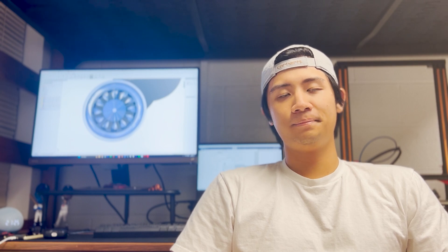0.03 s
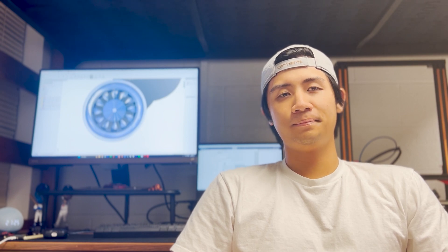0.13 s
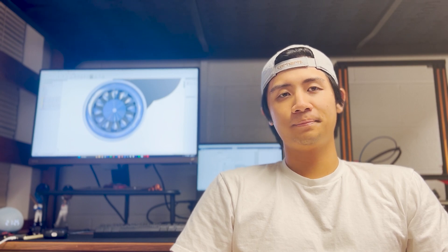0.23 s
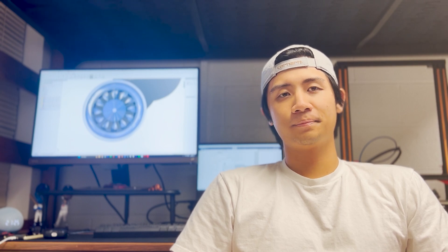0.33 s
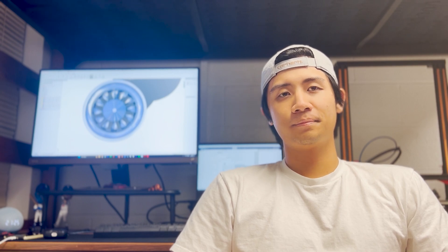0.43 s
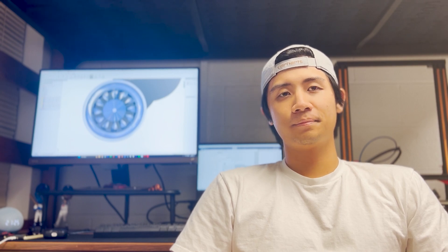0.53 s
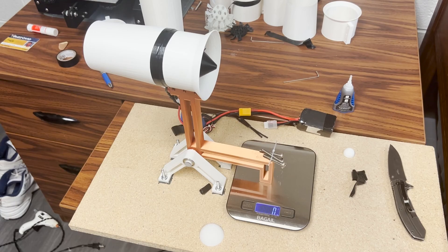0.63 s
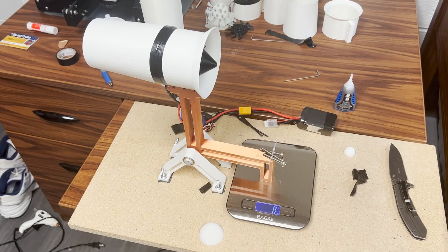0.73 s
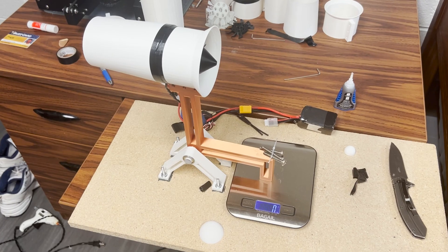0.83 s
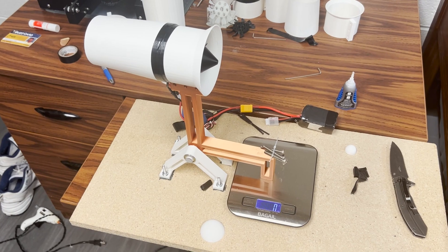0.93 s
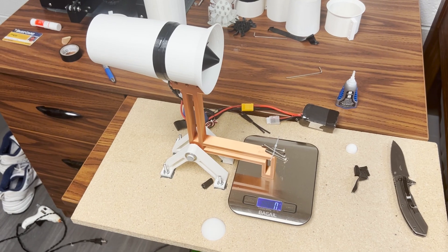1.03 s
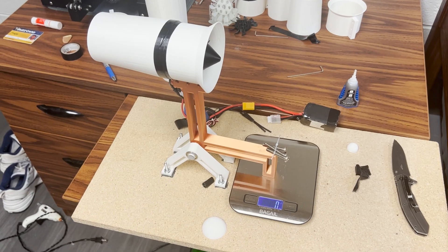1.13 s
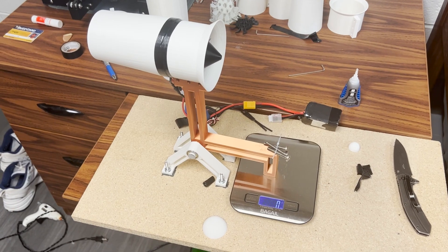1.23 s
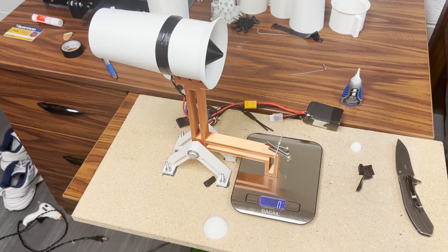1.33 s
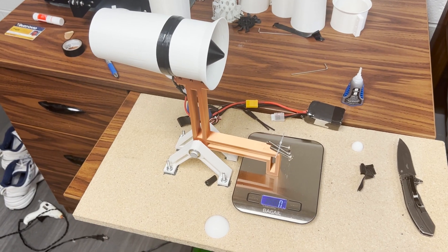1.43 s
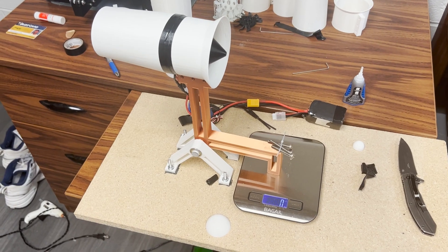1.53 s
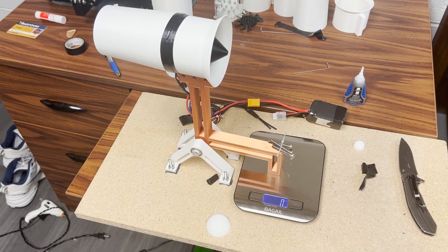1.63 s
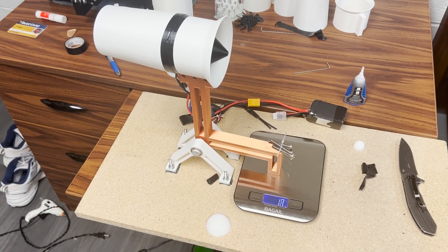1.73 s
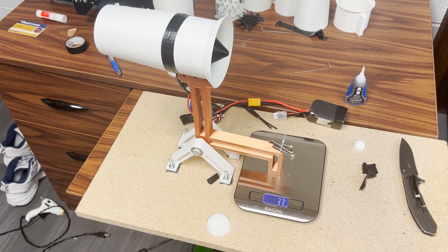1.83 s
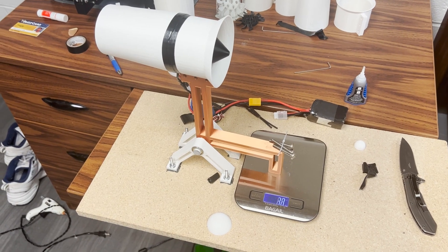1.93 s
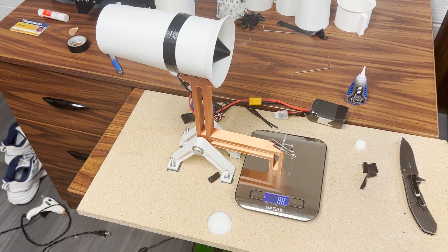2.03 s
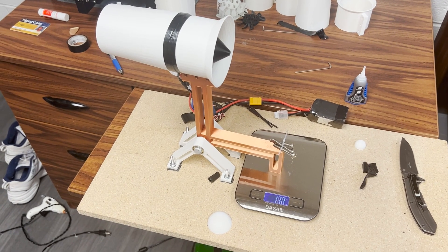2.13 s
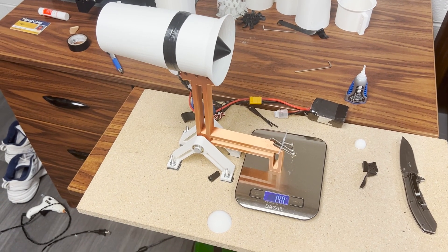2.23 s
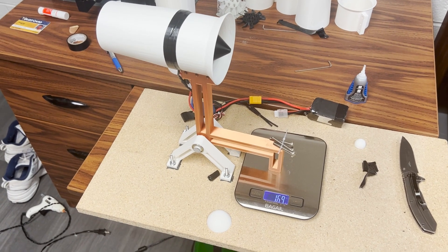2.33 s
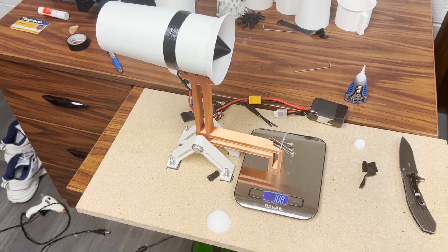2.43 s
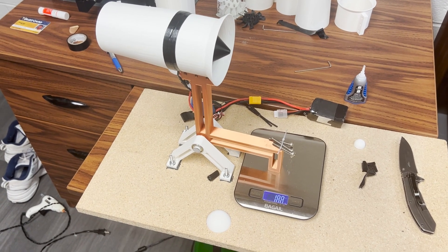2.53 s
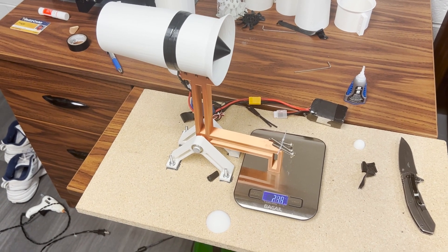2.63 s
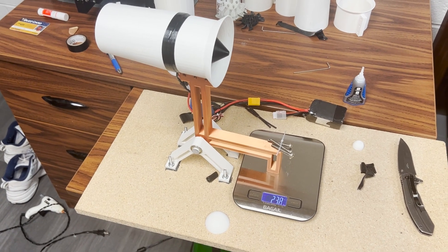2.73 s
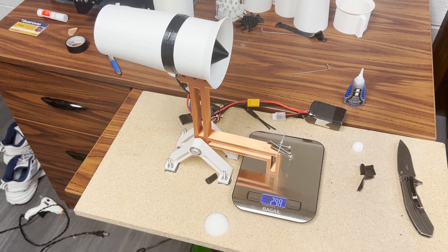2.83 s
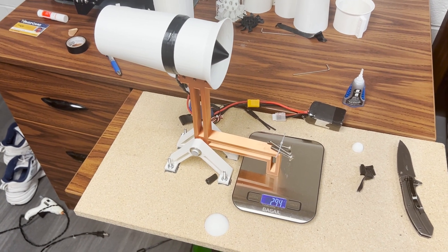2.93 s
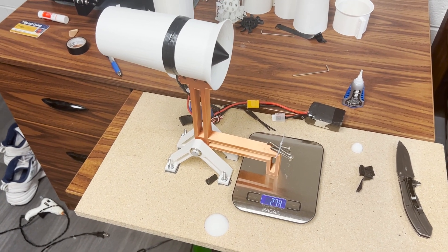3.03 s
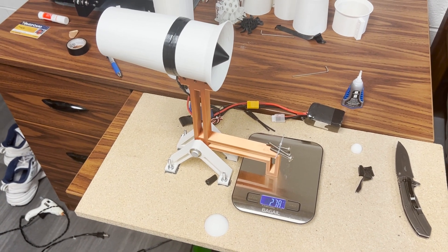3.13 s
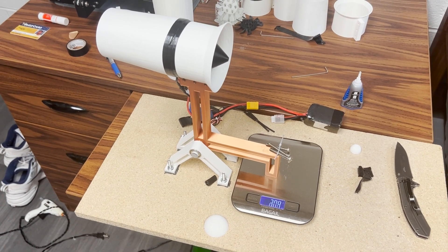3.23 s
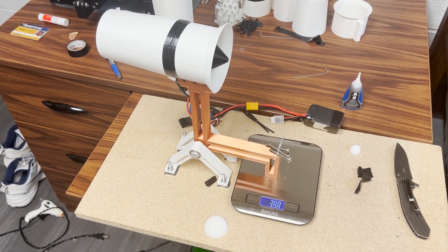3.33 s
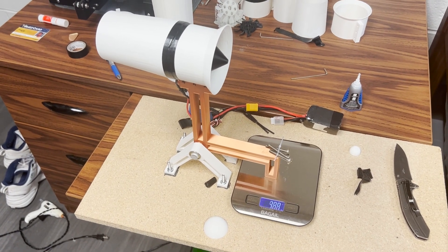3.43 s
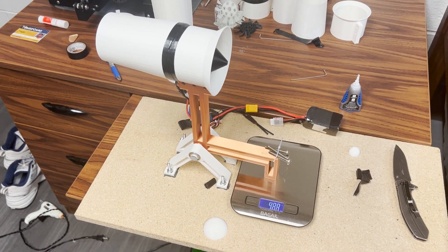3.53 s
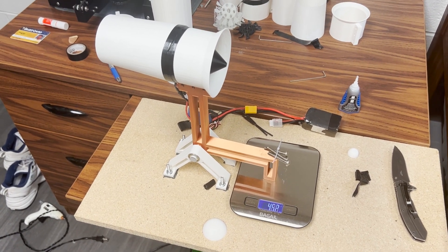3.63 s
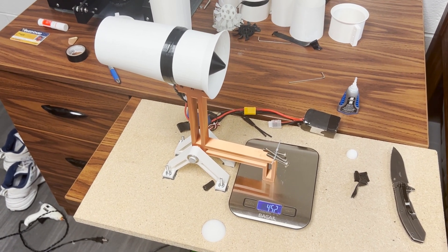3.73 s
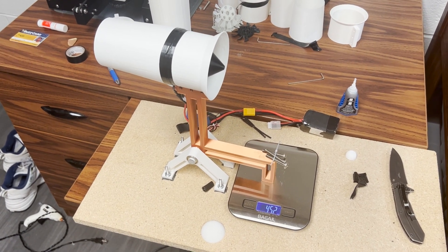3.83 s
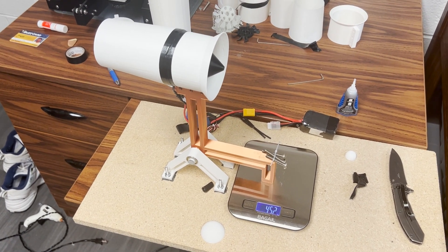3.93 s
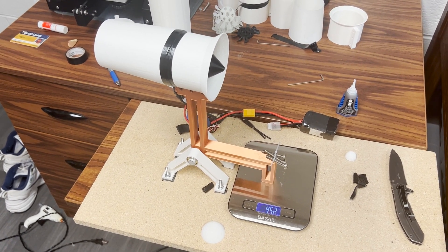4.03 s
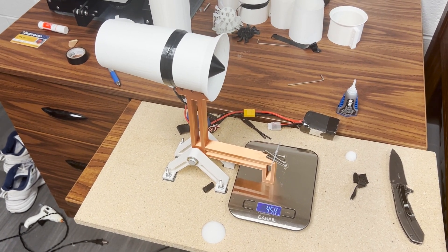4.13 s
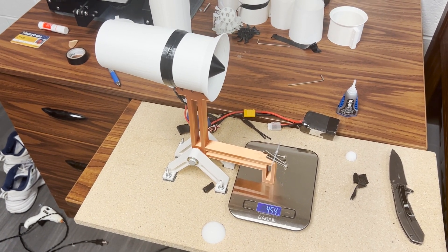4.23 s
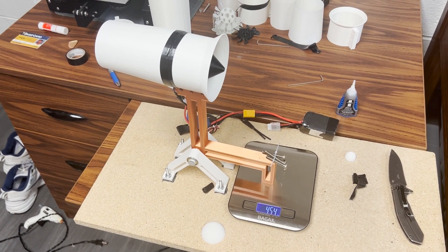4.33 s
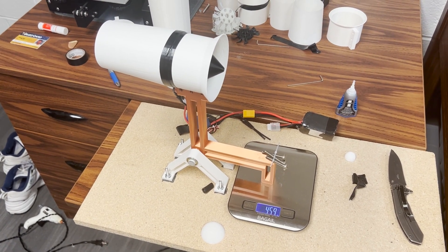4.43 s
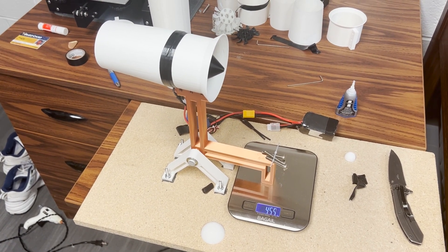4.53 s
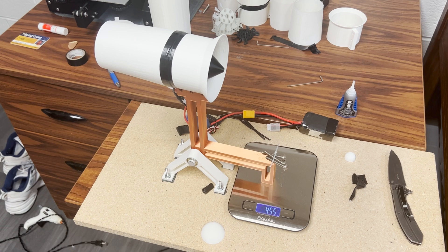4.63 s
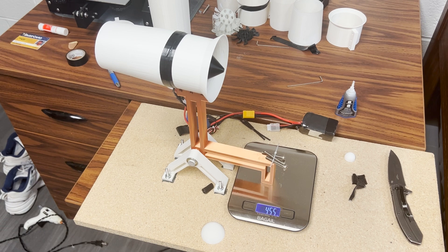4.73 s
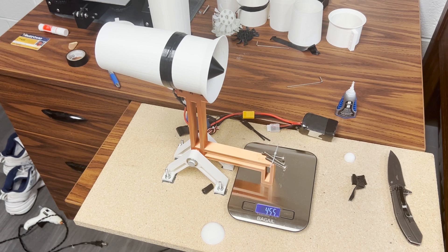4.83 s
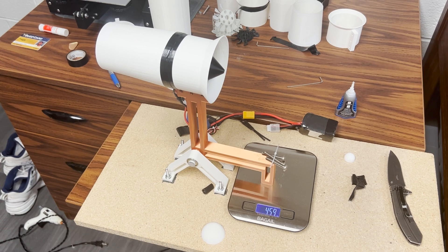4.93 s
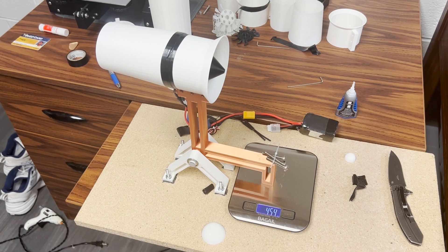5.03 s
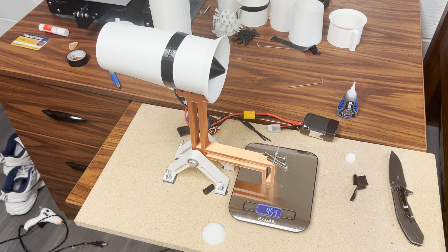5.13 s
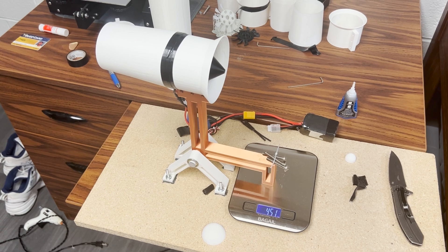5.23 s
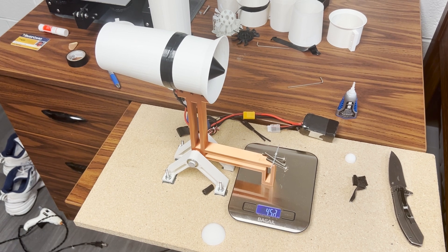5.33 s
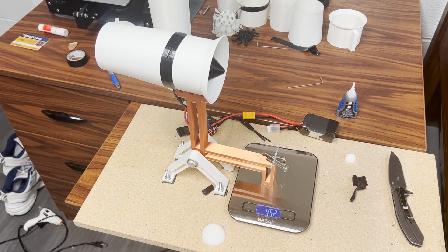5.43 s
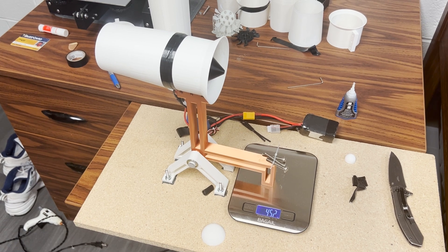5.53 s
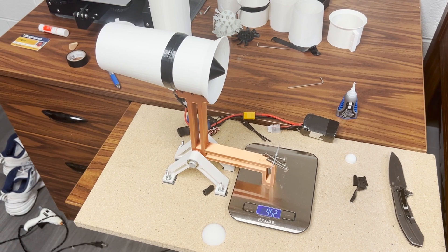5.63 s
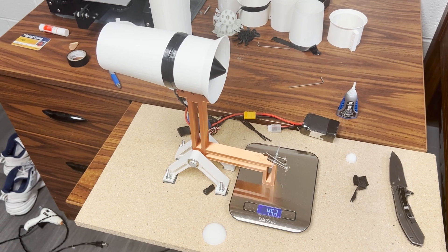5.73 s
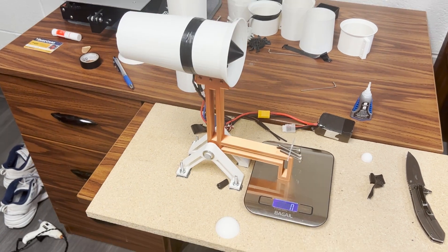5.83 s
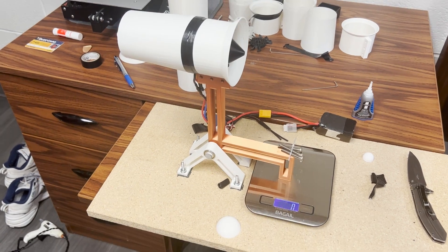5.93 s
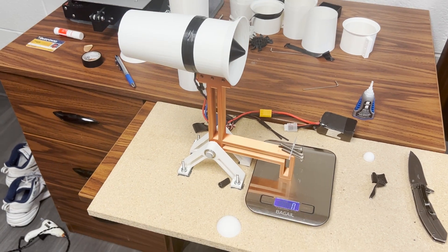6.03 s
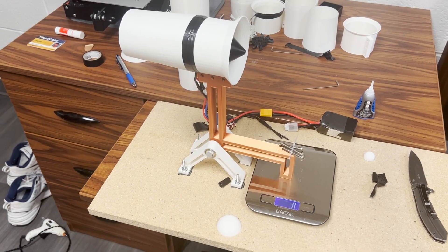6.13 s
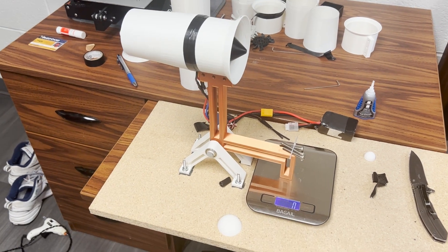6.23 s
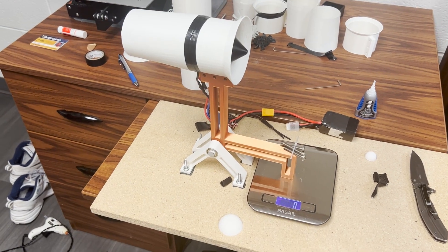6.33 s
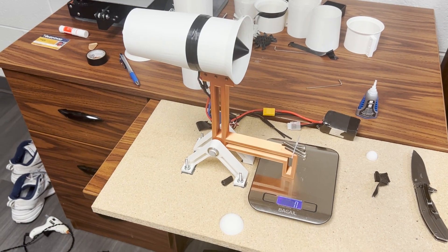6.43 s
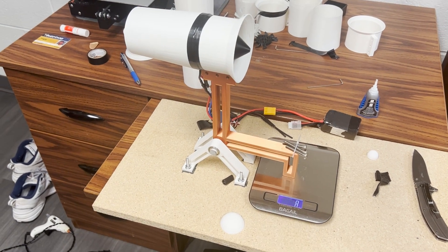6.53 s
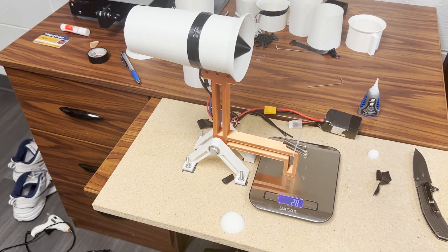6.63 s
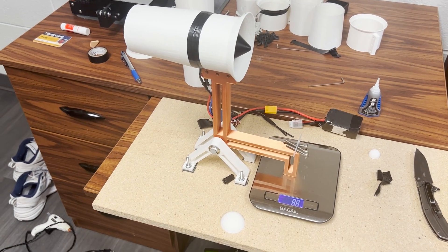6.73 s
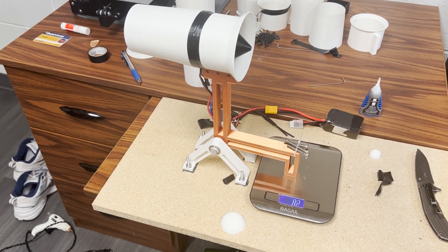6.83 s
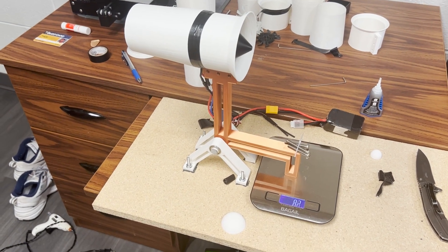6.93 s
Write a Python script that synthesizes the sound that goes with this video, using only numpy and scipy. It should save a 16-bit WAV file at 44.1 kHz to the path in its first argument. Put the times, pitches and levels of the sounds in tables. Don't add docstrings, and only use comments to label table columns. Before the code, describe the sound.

Low ventilation hum in a quiet room, changing slightly as the place changes. A small electric ducted fan on a stand snaps, chirps and spins up in uneven steps, its whine and airy howl climbing to a loud, steady level. It cuts out instantly; after a brief quiet, sharp clicks and a buzz begin a second spin-up. Close stereo microphone, small dry room.

```python
import sys
import numpy as np
from scipy import signal
from scipy.fft import rfft, irfft, next_fast_len
from scipy.io import wavfile
from scipy.ndimage import uniform_filter1d, map_coordinates

SR = 44100
rng = np.random.default_rng(int(sys.argv[2]) if len(sys.argv) > 2 else 0)


def makeup_ratio(level_db):
    decades = np.asarray(level_db, float) / 20
    return 10 ** decades


def transcribe(signal):
    frames = np.atleast_2d(signal).T
    limited = np.clip(frames, -1, 1)
    pcm = np.round(limited * 32767).astype(np.int16)
    wavfile.write(sys.argv[1], SR, pcm)


N = 308259
T = np.arange(N) / SR
SCENE_CHANGE, RUN_END, RESUME, RESTART = 0.66, 5.797, 5.817, 5.955
HOWL_ORDER = 6.26
WAKE_DB_PER_S = 951

# first_jolt_s, chopper_in_s, chopper_out_s, end_s
RUNS = [
    (1.24, 1.51, 3.05, 5.8),
    (5.994, 6.15, 7, 7),
]
# time_s, speed_hz
SPEED = [(1.24, 5), (1.5, 74), (1.72, 168), (1.83, 190), (1.97, 203), (2.12, 209.5), (2.35, 237.5),
         (2.49, 241.5), (2.62, 259.5), (2.86, 266), (3.06, 296), (3.185, 331.7), (5.8, 329.1), (5.96, 3),
         (6.2, 36), (6.48, 121), (6.69, 164), (6.99, 201.7)]
# time_s, level_db
EFFORT = [(1.26, -44.5), (1.42, -44.5), (1.54, -41), (1.6, -31.5), (1.69, -27), (2.04, -26), (2.19, -30),
          (2.32, -26), (2.95, -24), (3.16, -20), (3.33, -23.5), (4.0, -28), (4.8, -29.5), (5.8, -31),
          (6.05, -41), (6.23, -42), (6.59, -33), (6.99, -29)]

# frequency_hz, level_db
ROOMS = [
    [(15, -43), (25, -23), (108, -4.5), (246, -8), (327, -8.5), (351, -16), (423, -11.5), (617, -18),
     (694, -24), (1380, -23.5), (7000, -55.5), (9100, -93), (15400, -120)],
    [(15, -53), (25, -29.5), (133, -10.5), (252, -15), (662, -22), (763, -17), (922, -31), (1110, -22.5),
     (1250, -27.5), (1510, -26), (2260, -39), (2420, -34.5), (7000, -58.5), (9100, -85), (15400, -120)],
]
ROOM_LEVELS = [-43.5, -48.5]
# frequency_hz, correlation_ratio
ROOM_LIKENESS = [(60, 1), (240, 0.88), (950, -0.13), (3770, 0.22), (15000, -0.08)]

# shaft_multiple, level_db
WEAK_ORDERS = [(2, -36), (3, -34.5), (4, -35), (9, -34.5), (10, -45.5), (12, -38.5), (21, -36)]
# frequency_hz, width_hz, level_db (over the effort)
MOUNT_MODES = [(114, 46, -2.5), (205.7, 15, -4), (241.3, 11, -3.5), (262.5, 2.5, -8.5), (295.6, 13, 4),
               (318.8, 20.1, 7.5)]
# frequency_hz, width_hz, level_db (over the effort)
THROAT_MODES = [(2224, 210, 1.5), (2380, 155, 16), (2530, 55, 4.5), (3043, 75, 9.5), (3140, 220, 2.5),
                (3340, 300, -3), (3640, 34, 3)]
# frequency_hz, width_hz, level_db (over the effort)
MAGNET_MODES = [(4624, 53, 6.5)]

# frequency_hz, width_hz, lift_db (over the wash)
DUCT_MODES = [(736, 140, 9), (864.6, 62, 15.5), (1112, 180, 5), (1778, 31, 2.5), (1987, 210, 2.5),
              (2392, 26.3, 13), (3074, 78, 7.5), (3950, 490, 3.5), (4150, 42, 7), (4460, 190, 4.5),
              (4800, 540, 3.5), (6260, 280, 6.5), (6710, 110, 5), (7820, 570, 3)]
# frequency_hz, width_hz, level_db (over the effort)
PIPE_NOTES = [(900, 306, 21), (1970, 860, 4)]
# frequency_hz, level_db
RUSH_SPECTRUM = [(180, -11), (300, -4), (500, -1), (900, 2), (1500, 4.5), (2400, 5), (3300, 1.5), (5000, 0),
                 (7000, 0), (9400, 0)]
# frequency_hz, level_db
HISS_SPECTRUM = [(8500, 2.5), (9500, -3), (11000, 2.5), (13000, 0.5), (14500, -4), (15600, -15.5)]
# frequency_hz, level_db
RUMBLE_SPECTRUM = [(15, -50), (25, -27), (65, -4), (89, 0.5), (113, -22.5), (150, -7), (250, -21),
                   (320, -44.5), (550, -120)]
# time_s, level_db, fall_db_per_s
PUFFS = [
    (1.232, -34.5, 101),
    (1.243, -30, 698),
    (5.998, -24, 348),
]
# time_s, level_db, fall_db_per_s
THUMPS = [
    (1.24, -41, 100),
    (1.64, -39, 300),
    (4.49, -44, 33.5),
    (6.054, -29, 130),
]

# time_s, level_db, pitch_hz
BELL_RINGS = [(1.235, -25, 4560), (1.32, -30, 4570), (1.38, -36.5, 4690), (1.542, -19.5, 4720),
              (1.61, -12.5, 4700), (1.715, -25, 4620), (6.05, -37, 4540), (6.11, -37, 4500),
              (6.165, -39.5, 4500), (6.247, -33, 4500), (6.317, -26.5, 4650), (6.445, -28, 4700),
              (6.583, -35, 4730), (6.639, -32, 4700)]
# time_s, level_db, rise_db_per_s
SHAKES = [
    (1.239, -23, 669),
    (6.125, -21.5, 98),
]
# frequency_hz, width_hz, level_db
STAND_MODES = [(85, 30, -9.5), (203, 22, -8), (323.6, 5.2, 6), (382, 40, -9), (527, 120, 5)]
# time_s, peak_db, low_share_db
KICKS = [
    (1.2381, 6.5, -15),
    (5.9816, 2.5, 1),
    (5.9928, 5.5, -19),
    (6.007, 1, -12),
    (6.0288, -3.5, -4),
    (6.0494, -27, -8),
]
# frequency_hz, level_db, t60_s
KICK_MODES = [(2270, -5.5, 0.011), (4650, -17.5, .015), (6650, 0, 0.0069), (8110, 13.5, 0.0069),
              (885, -9, 0.023)]

CHOPPER_LINES = [(1, 0), (1, -14), (0, 28), (0, 42)]
SPLIT_LEVELS = [-17.5, -19, -16]
FAINT_LINES = [(1, -28), (1, 42), (2, -28), (2, -14)]
# frequency_hz, width_hz, lift_db
CAN_MODES = [(4276, 140, 24), (4700, 140, 17), (6000, 800, 11.5)]

# frequency_hz, correlation_ratio
FAN_LIKENESS = [(60, 0.94), (300, 1), (600, 0.85), (1200, 0.56), (2400, 0.89), (4600, 0.47), (8000, 0.78),
                (14000, 0.69)]
# frequency_hz, lead_rad
PORT_LEAD = [(700, -.1), (1030, .5), (1980, -.4), (3270, 1.2), (3960, -.6), (4570, .4), (5600, -.6),
             (6980, .3), (7490, -.9), (10000, -np.pi), (12400, -6.1), (13700, -6.6), (15200, -8)]
# frequency_hz, tilt_db
PORT_TILT = [(60, -.4), (300, .2), (600, .6), (1200, -.5), (4500, -.9), (9000, 0)]


def evened(x):
    return x / np.sqrt(np.mean(x ** 2) + 1e-20)


def read(points, hz):
    f, value = np.transpose(points)
    return np.interp(np.log(hz + 1), np.log(f + 1), value)


def track(rows, column=1):
    rows = np.array(rows)
    return np.interp(T, rows[:, 0], rows[:, column])


def coloured(x, db_of):
    size = next_fast_len(N)
    gain = makeup_ratio(db_of(np.fft.rfftfreq(size, 1 / SR)))
    return irfft(rfft(x, size) * gain, size)[..., :N]


def closed(points):
    return lambda hz: read(points, hz) - 60 * ((hz < points[0][0]) | (hz > points[-1][0]))


def without(x, band):
    return coloured(x, lambda hz: -60 * np.clip(np.minimum(hz - band[0], band[1] - hz) / 90, 0, 1))


def resonate(x, hz, width):
    turn = np.exp(2j * np.pi * np.cumsum(hz * np.ones(N)) / SR)
    r = np.exp(-np.pi * width / SR)
    return 2 * (turn * signal.lfilter([1 - r], [1, -r], x / turn)).real


def wander(seconds):
    size = round(seconds * SR)
    noise = uniform_filter1d(rng.standard_normal(N), size)
    return evened(uniform_filter1d(noise, size))


def tone(hz, db, waver_db=-1.5):
    level = np.sqrt(2) * makeup_ratio(db + waver_db * wander(0.029))
    return level * np.sin(2 * np.pi * (np.cumsum(hz) / SR + rng.random()))


def between(first, last, early=0, rise=.004):
    on = sum((T >= run[first] - early) & (T <= run[last]) for run in RUNS) > 0
    return uniform_filter1d(on * 1., round(rise * SR) + 1)


def burst_db(s, db, rise, fall):
    return db - np.maximum(rise * (s - T), fall * (T - s))


def swept_db(hz, modes, base_db):
    lift = sum(makeup_ratio(2 * db) / (1 + (2 * (hz - f) / width) ** 2) ** 2 for f, width, db in modes)
    return 10 * np.log10(makeup_ratio(2 * base_db) + lift)


def below(speed, hz, span):
    return np.clip((hz - speed) / span, 0, 1)


def duct_db(hz):
    lift = sum((makeup_ratio(2 * db) - 1) / (1 + (2 * (hz - f) / width) ** 2) for f, width, db in DUCT_MODES)
    return 10 * np.log10(1 + abs(lift))


def ports(direct, other, likeness, lead=None, tilt_db=None):
    size = next_fast_len(N)
    hz = np.fft.rfftfreq(size, 1 / SR)
    c = np.clip(read(likeness, hz), -1, 1)
    a = np.sqrt((1 + c) / 2) * rfft(direct, size)
    b = np.sqrt((1 - c) / 2) * rfft(other, size)
    turn = 1
    if lead is not None:
        turn = np.exp(.5j * read(lead, hz)) * makeup_ratio(read(tilt_db, hz) / 2)
    return irfft(np.array([(a + b) * turn, (a - b) / turn]), size)[:, :N]


def room_tone():
    out = np.zeros((2, N))
    second = np.clip((T - SCENE_CHANGE) / .01, 0, 1)
    for points, db, on in zip(ROOMS, ROOM_LEVELS, (1 - second, second)):
        a, b = evened(coloured(rng.standard_normal((2, N)), closed(points)))
        out += makeup_ratio(db + 1.2 * wander(0.066)) * ports(a, b, ROOM_LIKENESS) * on
    return out + tone(7220 + 0 * T, -90, 3) * second


def rotor(speed, effort):
    unbalance_db, blade_db, magnet_db = -22, -18, -15
    chopping = between(1, 2, rise=.1)
    waver_db = .7 + 2.5 * chopping
    formed_db = np.clip(.5 * (speed - 190), -18, 0)
    shaft_db = effort + swept_db(speed, MOUNT_MODES, unbalance_db) - 25 * below(speed, 75, 40)
    main = tone(speed, shaft_db, .7)
    for k, modes, db in ((11, THROAT_MODES, blade_db), (14, MAGNET_MODES, magnet_db)):
        main += tone(k * speed, effort + swept_db(k * speed, modes, db) + formed_db, waver_db)
    blur = evened(resonate(rng.standard_normal(N), 11 * speed, 70))
    blur_db = effort + swept_db(11 * speed, THROAT_MODES, blade_db) + formed_db - 6.5
    main += chopping * blur * makeup_ratio(blur_db)
    load_db = 0.9 * (effort + 27) + 50 * np.log10(speed / 330)
    weak = 0
    for k, db in WEAK_ORDERS:
        weak += tone(k * speed, db + load_db + .5 * duct_db(k * speed), 1.42 * waver_db)
    starting = (1 - between(1, 2)) * (speed < 100)
    weak += starting * tone(42 * speed, effort - 10, 5)
    return (main + weak) * between(0, 3, -.06)


def air_levels(speed, effort):
    wake_db = -WAKE_DB_PER_S * np.maximum(np.where(T < RESUME, RUNS[0][0], RUNS[1][0]) - T, 0)
    puff = sum(makeup_ratio(burst_db(s, db, WAKE_DB_PER_S, fall)) for s, db, fall in PUFFS)
    thump = sum(makeup_ratio(burst_db(s, db, 300, fall)) for s, db, fall in THUMPS)
    flow = makeup_ratio(effort + wake_db)
    howl_db = swept_db(HOWL_ORDER * speed, PIPE_NOTES, 4.5)
    howl_db = howl_db - 6 * below(speed, 114, 25)
    howl_db = howl_db + 0.65 * np.maximum(effort + 25, 0)
    full = 1 - below(speed, 331, 10)
    rumble = np.hypot((1 - full) * makeup_ratio(-49) + full * flow * makeup_ratio(-33), thump)
    hiss = flow * makeup_ratio(-1 - 5.5 * below(speed, 190, 90))
    return flow * makeup_ratio(howl_db), rumble, np.hypot(flow, puff), np.hypot(hiss, puff)


def stall_howl(noise, speed):
    sharpness, lip_hz, lip_width_hz, lip_db = 6.16, 1750, 100, 6
    warp = np.cumsum(speed) / speed.mean()
    centre = HOWL_ORDER * speed.mean()
    cells = resonate(noise, centre, centre / sharpness)
    cells = resonate(cells, centre, 1.3 * centre / sharpness)
    howl = map_coordinates(cells, [warp], order=3, mode="wrap")
    howl = evened(coloured(howl, lambda hz: 1.46 * duct_db(hz)))
    howl = evened(coloured(howl, lambda hz: lip_db / (1 + (2 * (hz - lip_hz) / lip_width_hz) ** 2)))
    howl /= np.sqrt(uniform_filter1d(howl ** 2, 6000) + 1e-3)
    slow = np.clip((100 - speed) / 15, 0, 1)
    return (1 - 0.26 * slow) * howl + slow * evened(resonate(noise, DUCT_MODES[1][0], 70))


def air(speed, effort):
    a, b, c, d = rng.standard_normal((4, N))
    howl = stall_howl(a, speed)
    rush = evened(coloured(b, lambda hz: closed(RUSH_SPECTRUM)(hz) + duct_db(hz)))
    body = coloured(rush, lambda hz: -60. * (hz > 4200))
    rush += body * (makeup_ratio(4.6 * np.log10(np.clip(speed, 40, 200) / 200)) - 1)
    rumble = evened(coloured(c, closed(RUMBLE_SPECTRUM)))
    hiss = evened(coloured(d, closed(HISS_SPECTRUM)))
    gusts = makeup_ratio(0.94 * wander(0.0029))
    swell, low, flow, tips = air_levels(speed, effort)
    mix = swell * howl + low * rumble + makeup_ratio(7) * flow * rush * gusts + tips * hiss * gusts
    return between(0, 3, .022) * mix


def bell(speed):
    sing_from_s, sing_to_s = 1.505, 1.66
    jolts = rng.standard_normal(N) * makeup_ratio(4.0 * wander(.008))
    hz = uniform_filter1d(track(BELL_RINGS, column=2), 3000)
    clean = uniform_filter1d(1. * ((T > sing_from_s) & (T < sing_to_s)), 600)
    rough = evened(resonate(resonate(jolts, hz, 130), hz, 260))
    ring = (1 - 0.72 * clean) * rough + clean * tone(hz, 0, .8)
    level_db = np.max([burst_db(s, db, 460, 280) for s, db, _ in BELL_RINGS], axis=0)
    steady = makeup_ratio(-34) * below(speed, 185, 30) * between(1, 2)
    return ring * np.hypot(makeup_ratio(level_db + 2.5), steady) * between(0, 3, .02)


def shake():
    push = rng.standard_normal(N)
    body = sum(makeup_ratio(db) * evened(resonate(push, hz, width)) for hz, width, db in STAND_MODES)
    level = sum(makeup_ratio(burst_db(s, db, rise, 290)) for s, db, rise in SHAKES)
    return evened(body) * level * between(0, 3, .02, .012)


def kicks():
    t, out = np.arange(2000) / SR, np.zeros(N)
    attack_s = 0.00037
    for s, db, low_db in KICKS:
        ring = 0
        for hz, level, t60 in KICK_MODES:
            decay = makeup_ratio(level + low_db * (hz < 3000) - 60 * t / t60)
            ring = ring + decay * np.sin(2 * np.pi * (hz * t + rng.random()))
        out[round(s * SR):][:2000] += makeup_ratio(db - 18.5) * ring * np.minimum(t / attack_s, 1)
    return out


def chopper(speed, effort):
    hz = 7805 - .75 * speed
    first = T < RESUME
    fade_db = np.where(first, 16, 3) * (1 - below(speed, 164.5 + 50, 50))
    whistle_db = np.where(first, -17.5, -22) - 8 * below(speed, 90, 65) - fade_db
    out = tone(2 * hz, -48 - 9 * (speed > 255), 5.0)
    skirt = evened(resonate(rng.standard_normal(N), hz + 150, 500))
    out += makeup_ratio(whistle_db - 10) * skirt + tone(hz, whistle_db, 2.5)
    for (m, k), db in zip(CHOPPER_LINES[1:], SPLIT_LEVELS):
        line = m * hz + k * speed
        line_db = effort + db + swept_db(line, CAN_MODES if m else CAN_MODES[2:], 0)
        if m:
            line_db = line_db - 12 * below(speed, 95, 40)
        else:
            line_db = line_db - 15.5 * (1 - below(speed, 195, 25))
        out += tone(line, line_db, 3.7)
    chirp_s, chirp_db, chirp_hz = 6.655, -21.5, 4390
    out += tone(chirp_hz + 900 * (T - chirp_s), burst_db(chirp_s, chirp_db, 700, 300), 2.3)
    for (m, k), db in zip(FAINT_LINES, (1, -5, -11, -15)):
        line = m * hz + k * speed
        heard = np.clip((line - 5300) / 600, 0, 1) * (line < 14600)
        out += heard * tone(line, effort - 7 + db, 3.2)
    return out * between(1, 2, rise=.003)


def scene():
    speed, effort = track(SPEED), track(EFFORT)
    fan = rotor(speed, effort) + air(speed, effort) + bell(speed) + shake() + kicks() + chopper(speed, effort)
    tail = rng.standard_normal(6000) * makeup_ratio(-60 * np.arange(6000) / SR / 0.14)
    echoes = signal.oaconvolve(fan, tail / np.linalg.norm(tail))[:N]
    running = (T < RESUME) | (T > RESTART)
    return ports(fan, echoes, FAN_LIKENESS, PORT_LEAD, PORT_TILT) * running + room_tone()


def top_cut(x):
    return signal.sosfilt(signal.butter(12, 15700, fs=SR, output="sos"), x)


def record(dry):
    null_hz, quiet_null_hz, quiet_db = (9440, 10370), (8950, 10900), -28
    gap = (T >= RUN_END) & (T < RESUME)
    left, right = dry * np.where(gap, makeup_ratio(-24 - 1500 * (T - RUN_END) * gap), 1)
    mid = without((left + right) / 2, null_hz)
    top = coloured(mid, lambda hz: -60. * (hz < 10400))
    is_quiet = uniform_filter1d(top ** 2, 1024) < makeup_ratio(2 * quiet_db - 30)
    quiet = uniform_filter1d(1. * is_quiet, 256)
    mid += quiet * (without(mid, quiet_null_hz) - mid)
    pair = mid + np.outer([1, -1], (left - right) / 2)
    pair = coloured(pair, lambda hz: -50. * (hz > 15750))
    return top_cut(np.clip(pair, -1, 1))


dry = scene()
out = record(dry)
transcribe(out)
```